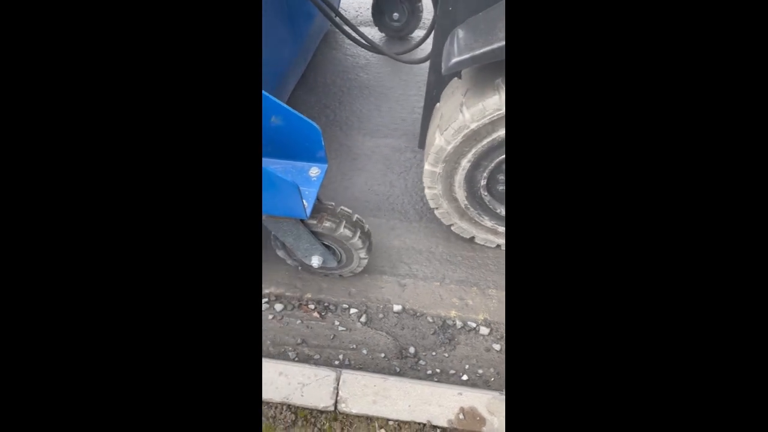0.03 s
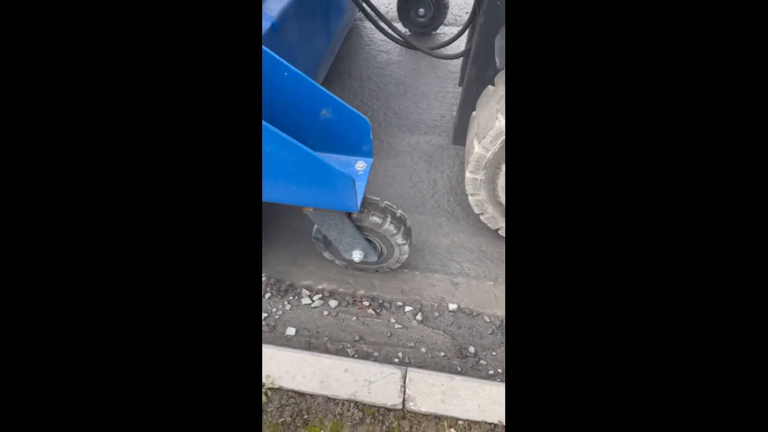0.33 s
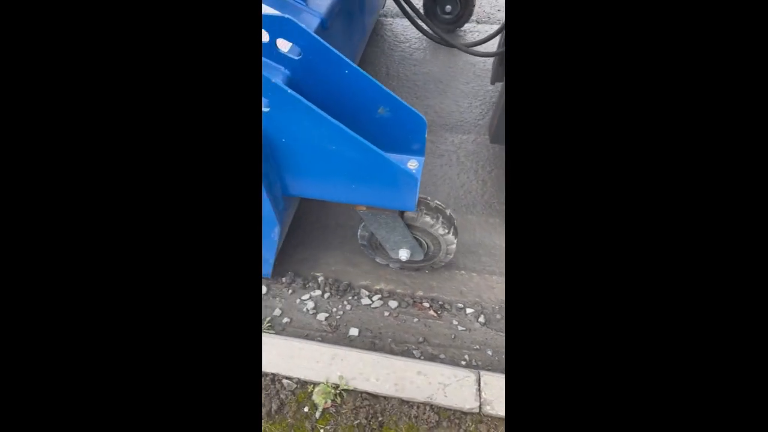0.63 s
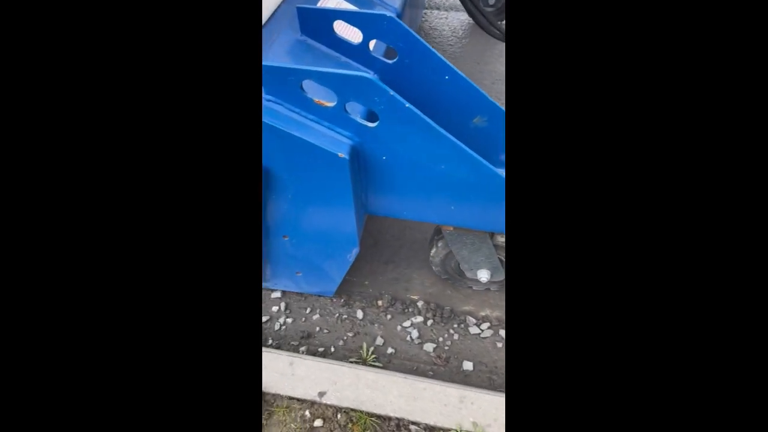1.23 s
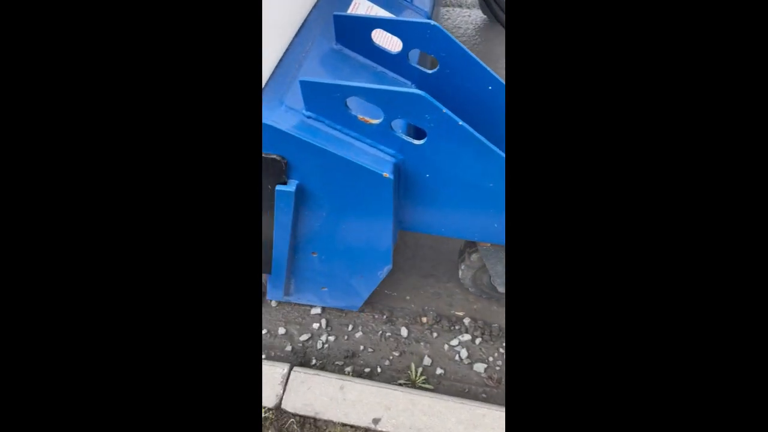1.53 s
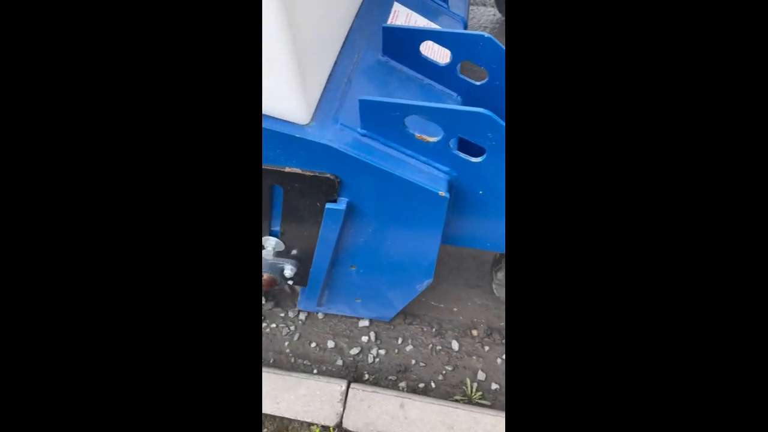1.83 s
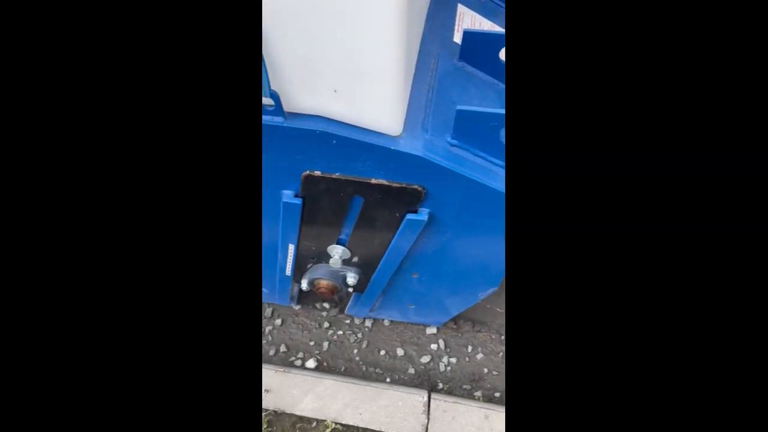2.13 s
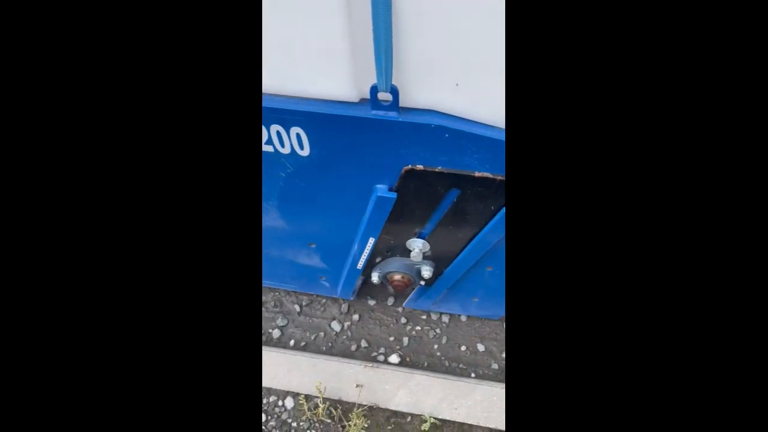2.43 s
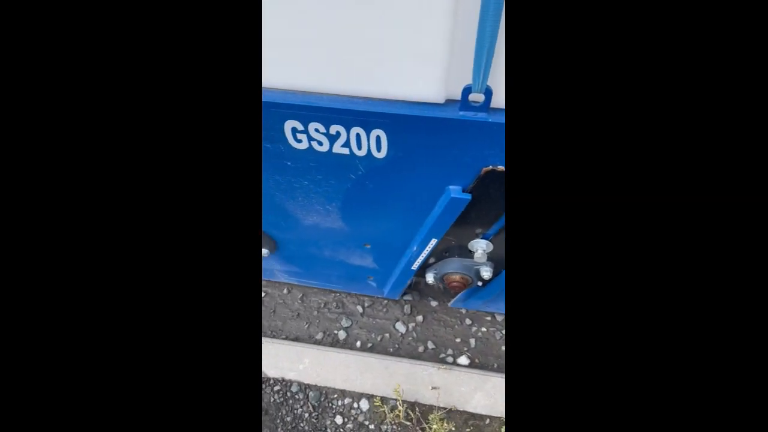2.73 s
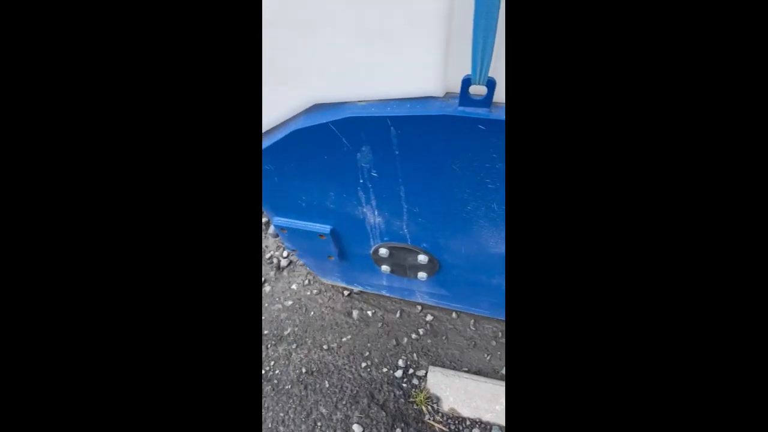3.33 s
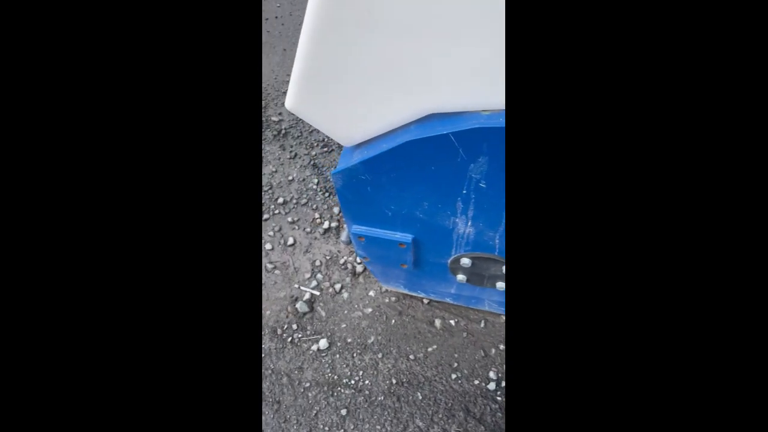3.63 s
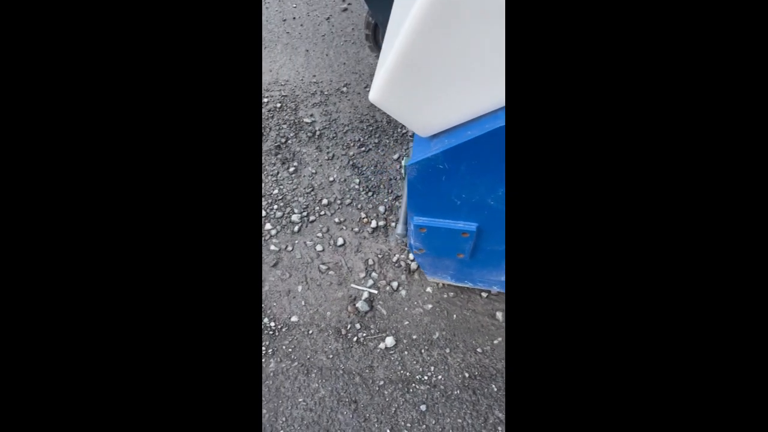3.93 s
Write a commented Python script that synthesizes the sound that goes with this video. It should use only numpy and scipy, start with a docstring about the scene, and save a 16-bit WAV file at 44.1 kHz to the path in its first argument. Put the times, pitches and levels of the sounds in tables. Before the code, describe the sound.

A sweeping machine hisses and drones along, flinging stones against metal and thudding with grit.

```python
"""Road sweeper passing

A telehandler pushes a hydraulic sweeper along a gravel verge. The diesel drones, oil hisses in the
hoses and the brush motor wavers under load. Bristles hiss on the asphalt and fling stones against
the steel hood; as the hopper comes alongside it rumbles and thuds with the grit thrown into it."""
import sys
import numpy as np
from scipy import signal
from scipy.fft import rfft, irfft
from scipy.io import wavfile

SR = 44100
rng = np.random.default_rng(int(sys.argv[2]) if len(sys.argv) > 2 else 0)


def to_wav(sig):
    """Store sig (one row per channel, or 1-D mono) as 16-bit WAV at the path in sys.argv[1].

    Samples outside -1..1 are clipped; the rate is SR.
    """
    pcm = np.clip(np.atleast_2d(sig), -1, 1) * 32767
    pcm = np.round(pcm).astype(np.int16)
    wavfile.write(sys.argv[1], SR, pcm.T)  # frames by channels


N = 176400
TIME_S = np.arange(N) / SR
FREQ_HZ = np.maximum(np.arange(N // 2 + 1) * SR / N, 1)


def from_db(db):
    """Decibels to gain."""
    return 10 ** (np.asarray(db) / 20)


def unit_rms(x):
    """Scale to rms 1."""
    return x / np.sqrt(np.mean(x ** 2) + 1e-20)


def in_time(rows):
    """Curve columns at every sample."""
    time_s, *columns = np.transpose(rows)
    return [np.interp(TIME_S, time_s, c) for c in columns]


def in_frequency(rows):
    """Spectrum columns at every bin."""
    hz, *columns = np.transpose(rows)
    return [np.interp(np.log(FREQ_HZ), np.log(hz), c) for c in columns]


def drift(rate_hz):
    """Slow random wander, rms 1."""
    return unit_rms(irfft(rfft(rng.standard_normal(N)) / (1 + (FREQ_HZ / rate_hz) ** 2), N))


# Stereo image: freq_hz, coherence, left_over_right_db, left_lead_rad
STEREO_IMAGE = [(100, 1, 0, 0), (230, .99, .6, .1), (450, .87, 8, .5), (720, .75, 9, .8),
                (950, .55, 9, 3.6), (1450, .65, 6, 5.2), (2300, .55, -2.5, 6.8), (4800, .5, -.5, 17.5),
                (6200, .8, 0, 20.3), (10000, .78, 0, 24.3), (15500, .82, 0, 29.4)]

def stereo(direct, diffuse):
    """Direct and diffuse spectra to left and right signals."""
    coherence, pan_db, lead_rad = in_frequency(STEREO_IMAGE)
    sides = np.array([[1], [-1]])
    gain = from_db(sides * pan_db / 2)
    gain /= np.linalg.norm(gain, axis=0)
    mix = np.sqrt(1 + coherence) * direct + np.sqrt(1 - coherence) * diffuse * sides
    return irfft(gain * np.exp(.5j * sides * lead_rad) * mix, N)


def coloured(pair, spectrum):
    """Two independent signals shaped to a spectrum; stereo, rms 1."""
    direct, diffuse = rfft(pair) * from_db(in_frequency(spectrum)[0])
    return unit_rms(stereo(direct, diffuse))


def frame_resonances(depth_db, width_hz=45):
    """Narrow resonances of the steel frame, as gain per bin."""
    smoothing = signal.butter(2, 1 / width_hz / 2, fs=N / SR, output="sos")
    ripple = unit_rms(signal.sosfiltfilt(smoothing, rng.standard_normal(len(FREQ_HZ)), padtype=None))
    lowest_mode_hz = HOOD_MODES[0][0]
    return from_db(depth_db * ripple * np.clip(FREQ_HZ / lowest_mode_hz - .5, 0, 1))


def noise(spectrum, flicker_db, ripple_db=0):
    """Stereo noise flickering in five interleaved sets of octaves."""
    bins = rfft(rng.standard_normal((2, N))) * frame_resonances(ripple_db)
    octave_set = np.log2(FREQ_HZ).astype(int) % 5
    pair = sum(irfft(bins * (octave_set == k), N) * from_db(flicker_db * drift(14)) for k in range(5))
    return coloured(pair, spectrum)


def harmonics(pitch_hz, orders, roughness, rough_hz):
    """Multiples of a running speed, each trembling in level and phase."""
    angle = 2 * np.pi * np.cumsum(pitch_hz) / SR
    wave = 0
    for order, db in orders:
        amplitude = from_db(db) * np.sqrt(2) * (1 + roughness * drift(rough_hz))
        phase = roughness * drift(rough_hz) + rng.uniform(0, 2 * np.pi)
        wave += amplitude * np.sin(order * angle + phase)
    return stereo(rfft(wave), 0)


# Diesel harmonics: crank_multiple, level_db
ENGINE_HARMONICS = [(2, -3.5), (3, -12.5), (4, -18), (7, -3.5), (9, -10.5), (12, -8), (14, -8)]
# Diesel envelope: time_s, level_db
ENGINE_LEVEL = [(0, -29), (.9, -31), (1.3, -34.5), (2, -34.5), (2.2, -38), (2.7, -36.5), (3.1, -30)]
CRANK_HZ = 32.86

def engine():
    """Four-cylinder diesel at governed speed."""
    crank_hz = CRANK_HZ * (1 + .0015 * drift(4.4))
    drone = harmonics(crank_hz, ENGINE_HARMONICS, roughness=.096, rough_hz=3.3)
    return from_db(in_time(ENGINE_LEVEL)[0]) * drone


# Oil hiss: freq_hz, density_db
HOSE_SPECTRUM = [(2800, -25), (4150, 0), (5400, -25)]

def hoses(level_db=-36, fade_db_per_s=3.5):
    """Oil rushing through the hoses: a narrow hiss that recedes with the carrier."""
    hiss = coloured(rng.standard_normal((2, N)), HOSE_SPECTRUM)
    return from_db(level_db - fade_db_per_s * TIME_S) * hiss


# Motor under load: time_s, pulse_hz, level_db
MOTOR_RUN = [(0, 92.6, -24), (.13, 94.1, -39), (.27, 97.9, -29), (.43, 92.4, -21), (.54, 97.4, -30),
             (.64, 97.5, -28), (.76, 95, -44), (.87, 92.4, -23), (1.12, 102, -36), (1.3, 96, -29.5),
             (1.54, 102.5, -30), (1.73, 93.5, -32.5), (1.95, 101, -31), (2.17, 92.4, -34), (2.42, 99, -38),
             (2.58, 92.2, -26), (2.88, 100.9, -37), (3.6, 101.9, -29)]
# Motor harmonics: pulse_multiple, level_db
MOTOR_HARMONICS = [(2, 0), (3, -12.5), (4, -14), (5, -18), (6, -16.5)]

def brush_motor():
    """The hydraulic motor slows and recovers as the brush bites."""
    pulse_hz, level_db = in_time(MOTOR_RUN)
    return from_db(level_db) * harmonics(pulse_hz, MOTOR_HARMONICS, roughness=.22, rough_hz=22)


def grit_clicks(rate_per_s, spread_db):
    """Flying grit: two trains of random clicks of uneven size."""
    sizes = from_db(spread_db * np.minimum(rng.exponential(1, (2, N)), 4))
    signs = rng.choice([-1, 1], (2, N))
    return sizes * signs * (rng.random((2, N)) < rate_per_s / SR)


# Sweeping envelopes, before trim: time_s, hiss_db, grit_db, roar_db
SWEEP_LEVELS = [(0, -32, -33.5, -29.5), (1, -34.5, -34, -29.5), (1.15, -38.5, -36, -33),
                (2, -39.5, -35.5, -32.5), (2.15, -38.5, -42.5, -37), (2.6, -36, -38, -36),
                (3.35, -61, -39, -28.5), (4, -61, -43, -35)]
# Bristle hiss: freq_hz, density_db
BRISTLE_SPECTRUM = [(2500, -20), (5000, -1), (6300, 0), (8000, -2), (12500, -3.5), (15600, 2)]
# Grit spray: freq_hz, density_db
GRIT_SPECTRUM = [(900, 4), (1500, -5), (2300, 3), (3000, 1), (5300, 1.5), (7500, -5)]
# Machine roar: freq_hz, density_db
ROAR_SPECTRUM = [(25, -46), (45, -22), (90, -3.5), (290, 0), (340, -4.5), (480, 4), (700, -3), (1180, -6),
                 (1900, -8), (4000, -27)]
HISS_TRIM_DB, GRIT_TRIM_DB, ROAR_TRIM_DB = .5, 3.5, 3

def sweeping():
    """Bristles hiss on asphalt and spray grit; the machine's roar throbs with the engine."""
    hiss_db, grit_db, roar_db = in_time(SWEEP_LEVELS)
    grit = noise(GRIT_SPECTRUM, flicker_db=1.5, ripple_db=1.4)
    grit += .68 * coloured(grit_clicks(rate_per_s=720, spread_db=2.5), GRIT_SPECTRUM)
    crank_angle = 2 * np.pi * CRANK_HZ * TIME_S
    throb = 1 + .066 * (np.cos(3 * crank_angle) + np.cos(5 * crank_angle))
    roar = throb * noise(ROAR_SPECTRUM, flicker_db=2.5, ripple_db=1.4)
    hiss = coloured(rng.standard_normal((2, N)), BRISTLE_SPECTRUM)
    return (from_db(hiss_db + HISS_TRIM_DB) * hiss
            + from_db(grit_db + GRIT_TRIM_DB) * grit
            + from_db(roar_db + ROAR_TRIM_DB) * roar)


def decay(t, t60_s):
    """Exponential fall, 60 dB in t60_s."""
    return 1000.0 ** (-t / t60_s)


def panel_clatter(panel, t, pitch_hz):
    """A crack and a short clatter of the panels, strongest near the stone's pitch."""
    n = len(t)
    start = rng.integers(N - n)
    crack = from_db(-2) * decay(t, t60_s=.044)
    clatter = from_db(-10) * decay(t, t60_s=.16)
    burst = panel[:, start:start + n] * (crack + clatter)
    bin_hz = np.fft.rfftfreq(2 * n, 1 / SR)
    octaves = np.log2(np.maximum(bin_hz / pitch_hz, .37))
    return irfft(rfft(burst, 2 * n) * from_db(-5 * octaves ** 2))[:, :n]


# Steel hood modes: freq_hz, relative_db
HOOD_MODES = [(760, -7), (890, -5.5), (1050, -5), (1440, -3), (1720, -6), (2380, 1), (2760, -0.5),
              (3520, -3.5), (4090, 6.5), (4500, 6.5), (5170, 7)]
RING_DB, RING_DB_PER_HIT_DB, RING_FALL_DB_PER_OCTAVE = -14, .46, 6
CLINK_DB, ATTACK_S = -11.5, .0014

def stone_hit(panel, level_db, pitch_hz):
    """One stone clinks and clatters on the hood; harder hits ring the steel disproportionately."""
    t = TIME_S[:SR // 4]
    hit = panel_clatter(panel, t, pitch_hz)
    ring_db = RING_DB + RING_DB_PER_HIT_DB * level_db
    modes = []
    for hz, db in HOOD_MODES:
        fall_db = RING_FALL_DB_PER_OCTAVE * max(np.log2(hz / pitch_hz), 0)
        modes.append((hz * rng.normal(1, .02), ring_db + db - fall_db + rng.normal(0, 2.5)))
    image_hz, _, pan_db, _ = np.transpose(STEREO_IMAGE)
    for hz, db in modes + [(pitch_hz, CLINK_DB)]:
        phase = rng.uniform(0, 2 * np.pi) + .5 * rng.standard_normal((2, 1))
        pan = from_db(np.interp(hz, image_hz, pan_db) * np.array([[.5], [-.5]]))
        t60_s = .15 * (1000 / hz) ** .76
        hit += pan * from_db(db) * decay(t, t60_s) * np.sin(2 * np.pi * hz * t + phase)
    return from_db(level_db) * hit * (1 - np.exp(-t / ATTACK_S))


# Stones on the hood: start_s, level_db, pitch_hz
STONE_HITS = [(.047, -11, 3600), (.051, -12, 1090), (.186, -14, 3060), (.593, -5.5, 3900),
              (1.0395, -5, 4090), (1.041, -4, 2388), (1.044, -9, 1270), (1.587, -14.5, 1180),
              (1.91, -17, 3400), (1.9555, -12.5, 3000), (2.0915, -3.5, 2750), (2.096, -10, 1700),
              (2.3815, -8, 3102), (2.603, -8, 2400), (2.678, -11.5, 1150), (2.792, -15.5, 2700),
              (2.8858, -13, 2390), (3.0709, -15, 1600), (3.173, -8.5, 1520), (3.2171, -14, 2200),
              (3.392, -8, 1470), (3.4845, -12.5, 1900), (3.722, -12, 1460), (3.7484, -12.5, 1307),
              (3.928, -13, 2360), (3.9629, -5, 1670)]
# Panel clatter: freq_hz, density_db
PANEL_SPECTRUM = [(150, -1), (700, 5.5), (4200, 0), (6000, 0), (8000, -5), (15000, 0)]
PEBBLES_PER_S, PEBBLE_DB = 24, -25.5

def stones():
    """Big stones strike the hood among a random patter of pebbles."""
    panel = noise(PANEL_SPECTRUM, flicker_db=.5, ripple_db=3.5)
    pebbles = [(when * N / SR, PEBBLE_DB + 8 * (force - .5), 900 * 3 ** height)
               for when, force, height in rng.random((int(PEBBLES_PER_S * N / SR), 3))]
    out = np.zeros((2, N + SR))
    for start_s, level_db, pitch_hz in list(STONE_HITS) + pebbles:
        hit = stone_hit(panel, level_db, pitch_hz)
        start = int(start_s * SR)
        out[:, start:start + hit.shape[1]] += hit
    return out[:, :N]


# Hopper envelope: time_s, level_db
HOPPER_LEVEL = [(2.55, -55), (2.68, -34.5), (2.86, -31.5), (3.0, -28.5), (3.18, -22), (3.33, -20.5),
                (3.4, -27.5), (3.52, -21), (3.8, -26), (3.9, -22)]
# Hopper rumble: freq_hz, density_db
HOPPER_SPECTRUM = [(22, -44), (42, 1.5), (100, -2), (200, 2.5), (290, 2.5), (400, -6.5), (550, -5.5),
                   (750, -13.5), (1400, -15.5), (3000, -34.5)]
# Heavy thuds: start_s, peak_db, start_pitch_hz
HOPPER_THUDS = [(2.985, -18, 280), (3.157, -17, 90), (3.33, -15.5, 170), (3.549, -10.5, 250),
                (3.748, -9, 275)]
THUD_RISE_S, PITCH_HALVING_S, THUD_NOISE_GAIN = .0092, .078, .28

def hopper():
    """Grit rumbles in the hollow hopper; each heavy thud swells, booms and sags in pitch."""
    rumble_gain = from_db(in_time(HOPPER_LEVEL)[0])
    booms = 0
    for start_s, peak_db, start_pitch_hz in HOPPER_THUDS:
        t = np.maximum(TIME_S - start_s, 0)
        swell = from_db(peak_db) * t / THUD_RISE_S * np.exp(1 - t / THUD_RISE_S)
        cycles = start_pitch_hz * PITCH_HALVING_S * np.log1p(t / PITCH_HALVING_S)
        booms += swell * np.sin(2 * np.pi * cycles)
        rumble_gain = np.hypot(rumble_gain, THUD_NOISE_GAIN * swell)
    return rumble_gain * noise(HOPPER_SPECTRUM, flicker_db=2.2) + booms


def scene():
    """The whole machine, from beside the kerb."""
    return engine() + hoses() + brush_motor() + sweeping() + stones() + hopper()


def record(dry):
    """Clip at full scale, then low-pass steeply."""
    cutoff_hz = 15850
    return irfft(rfft(np.clip(dry, -1, 1)) / np.sqrt(1 + (FREQ_HZ / cutoff_hz) ** 300), N)


dry = scene()
out = record(dry)
to_wav(out)
```